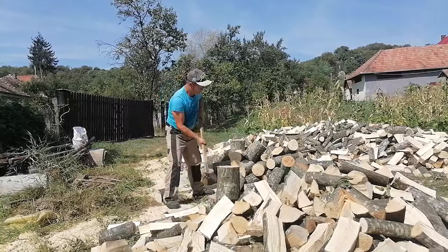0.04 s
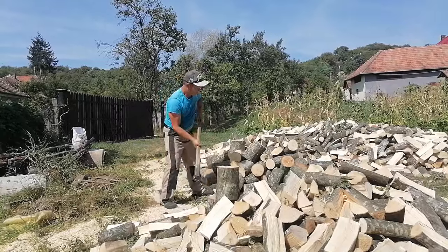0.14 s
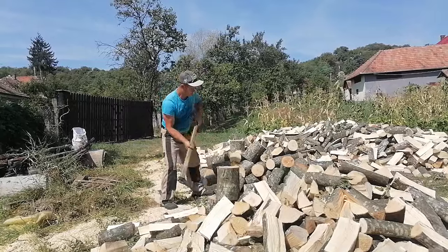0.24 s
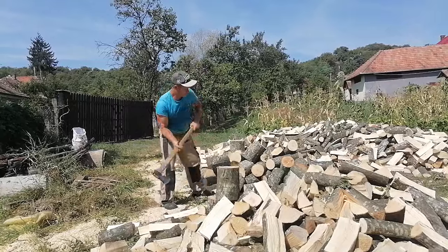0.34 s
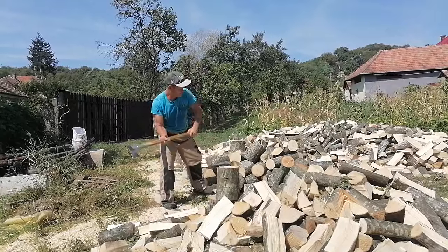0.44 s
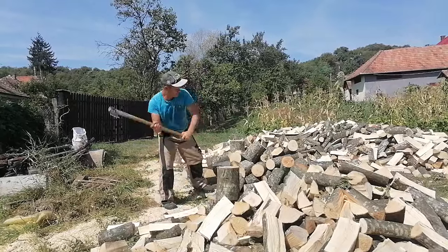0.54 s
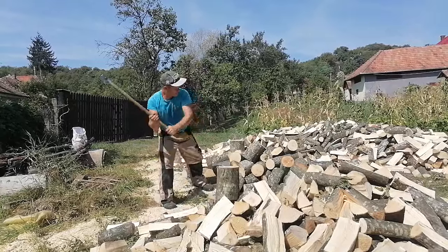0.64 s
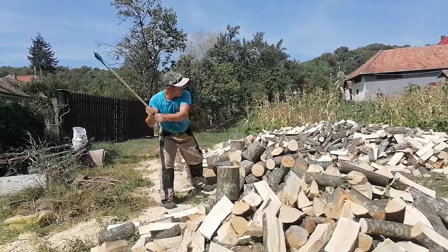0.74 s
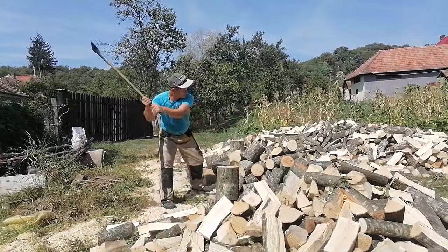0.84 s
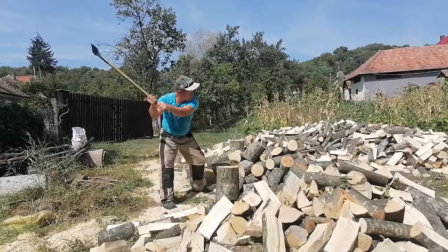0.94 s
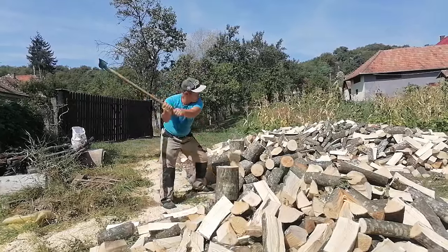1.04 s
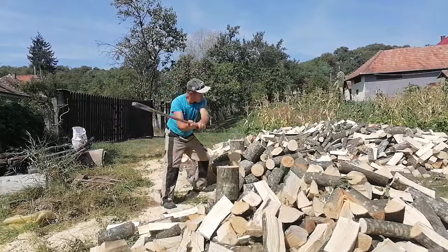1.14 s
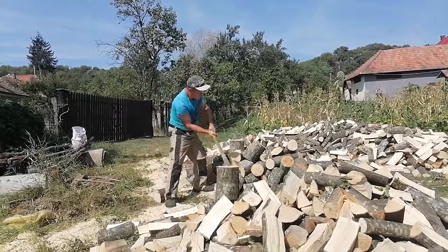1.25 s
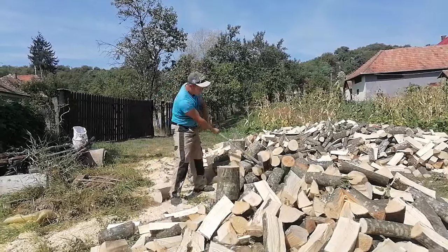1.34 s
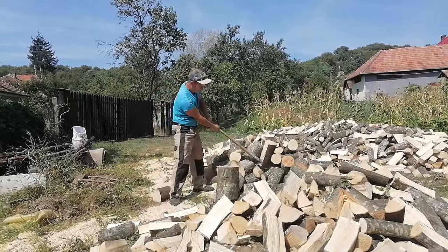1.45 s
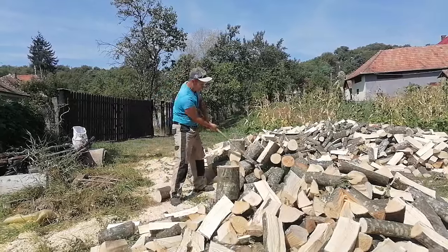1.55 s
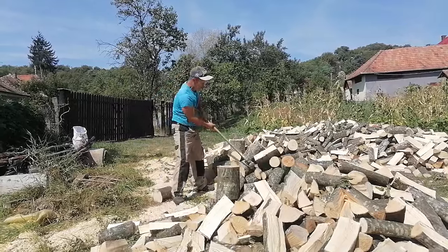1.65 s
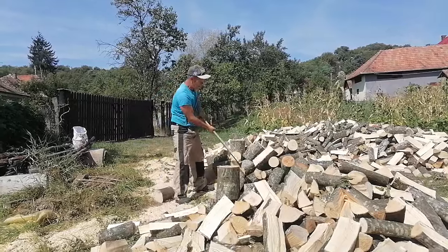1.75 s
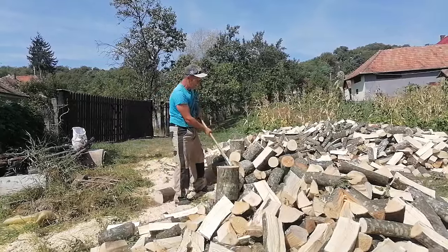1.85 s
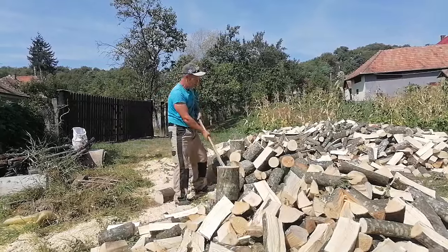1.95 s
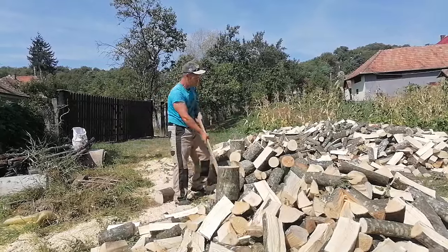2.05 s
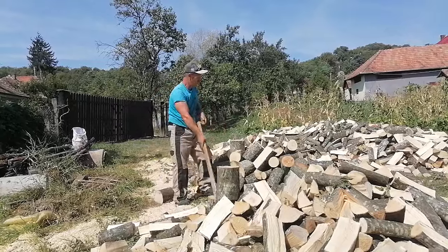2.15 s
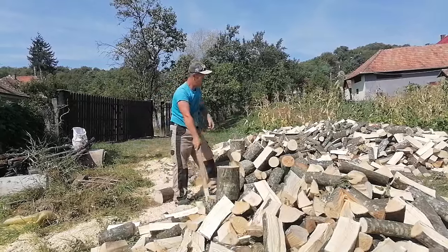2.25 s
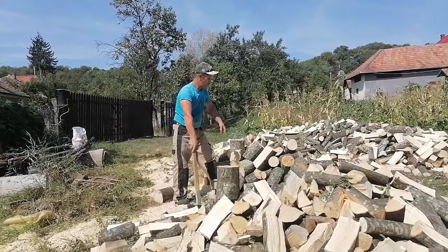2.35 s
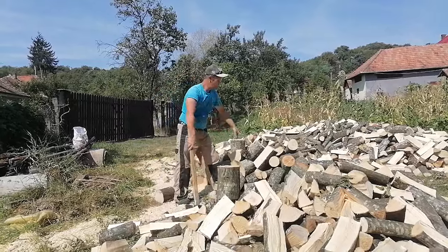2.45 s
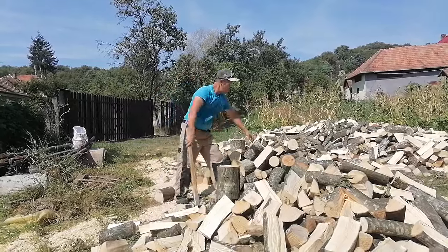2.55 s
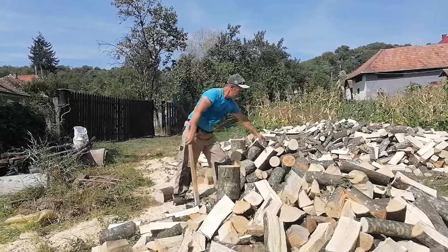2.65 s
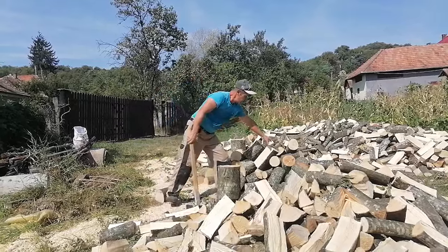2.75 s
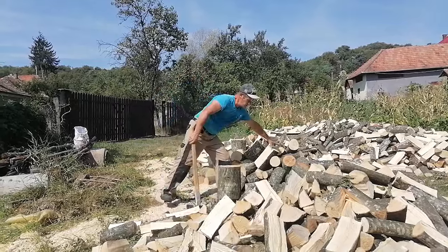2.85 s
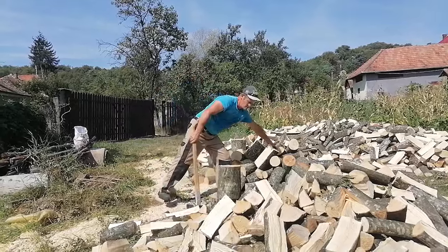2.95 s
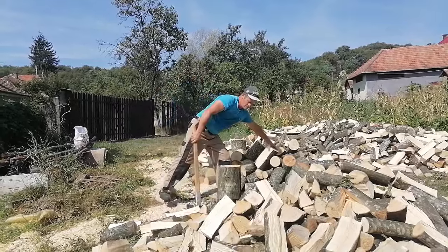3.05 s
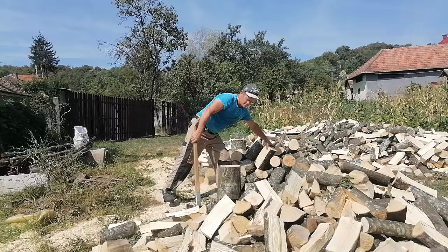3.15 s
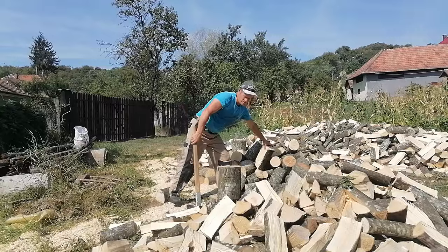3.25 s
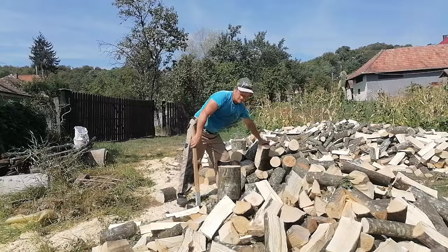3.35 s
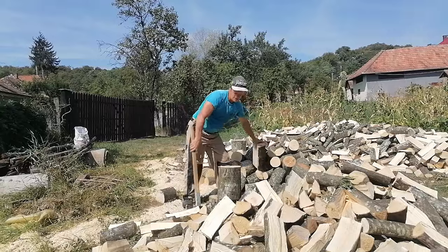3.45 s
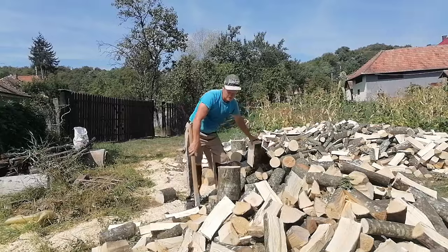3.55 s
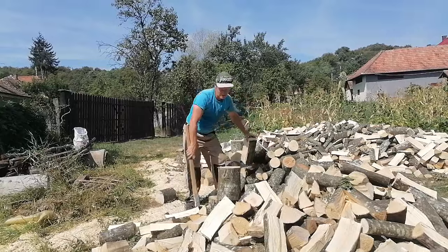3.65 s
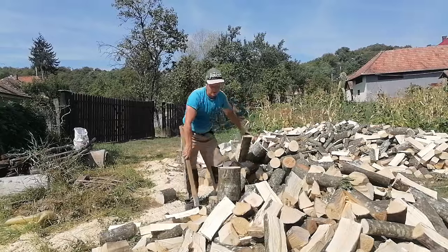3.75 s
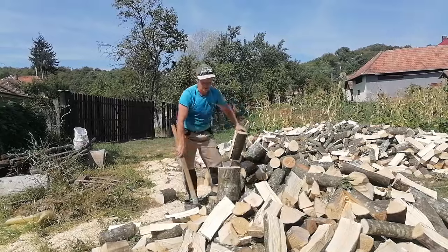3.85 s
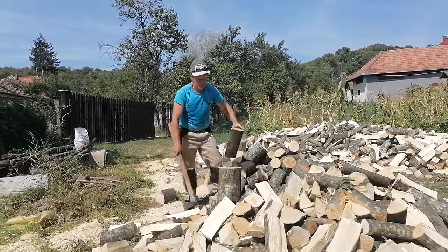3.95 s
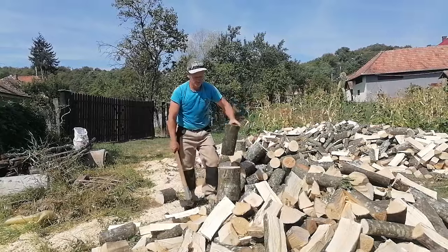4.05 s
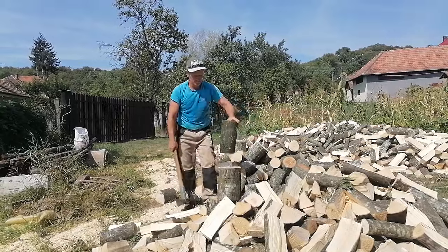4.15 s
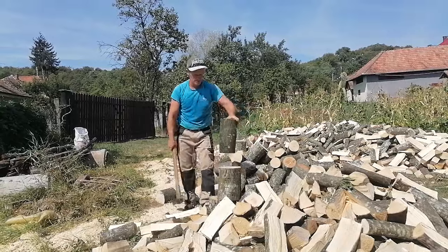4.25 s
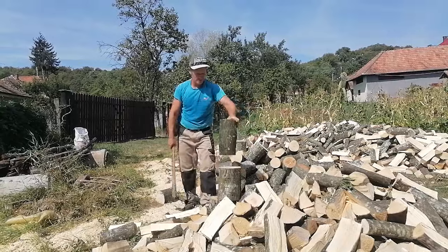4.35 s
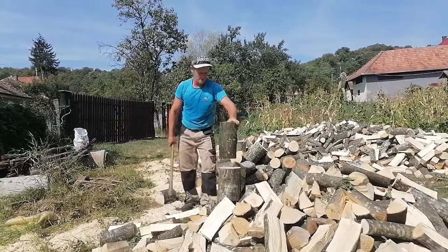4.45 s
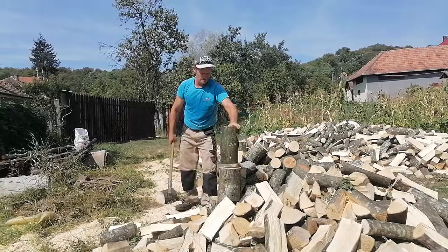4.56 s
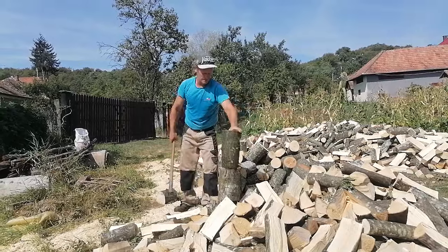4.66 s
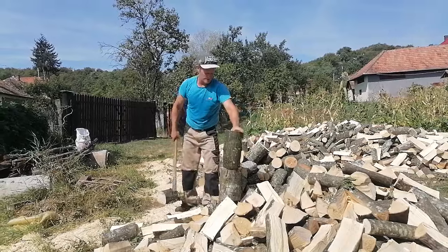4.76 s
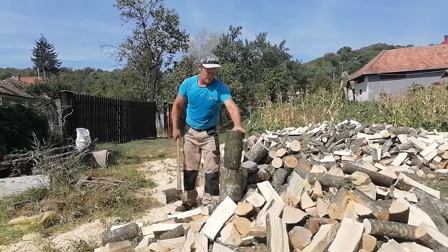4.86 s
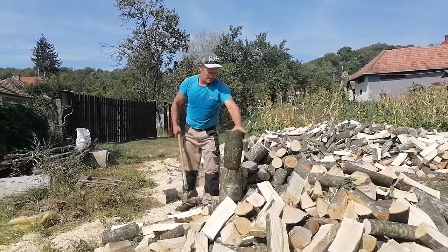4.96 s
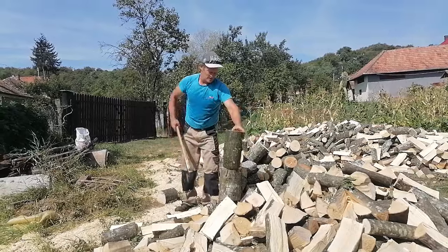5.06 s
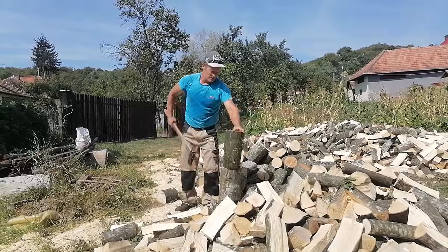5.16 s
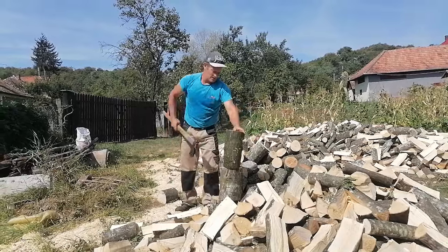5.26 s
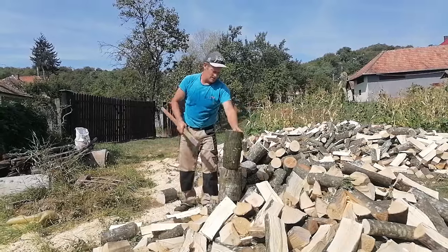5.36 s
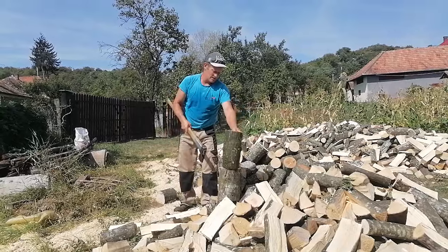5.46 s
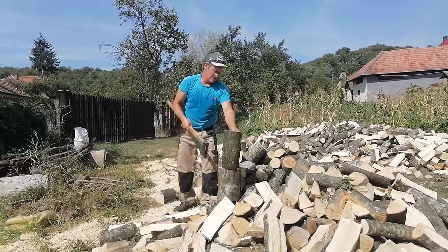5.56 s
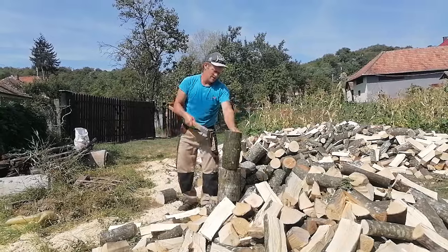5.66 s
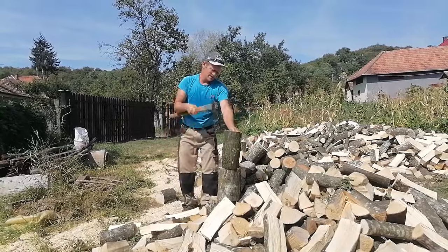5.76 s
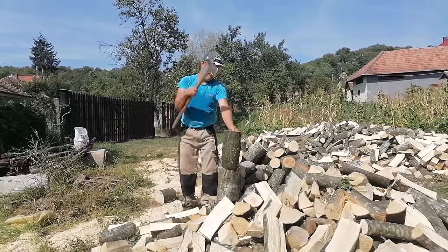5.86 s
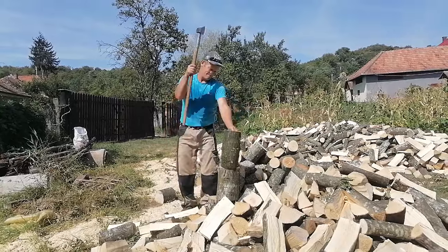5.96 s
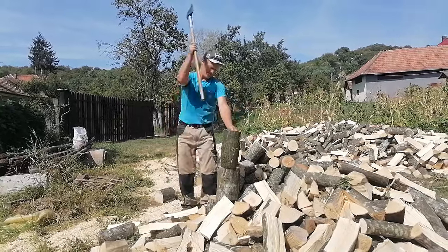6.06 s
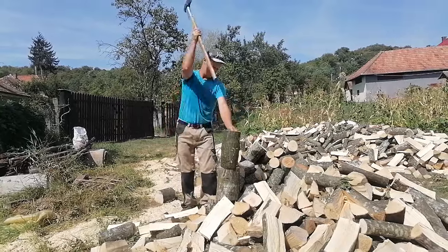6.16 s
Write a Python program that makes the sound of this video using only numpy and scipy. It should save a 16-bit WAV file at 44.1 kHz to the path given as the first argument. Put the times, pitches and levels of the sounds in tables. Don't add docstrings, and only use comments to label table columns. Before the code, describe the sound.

An axe cracks sharply into a log in a quiet country yard, split halves tumble with woody knocks, then a new log thuds onto the block.

```python
import sys
import numpy as np
from scipy import signal
from scipy.fft import rfft, irfft, next_fast_len
from scipy.io import wavfile

SR = 44100
rng = np.random.default_rng(int(sys.argv[2]) if len(sys.argv) > 2 else 0)


def ratio(d):
    e = np.asarray(d, float) / 20
    return 10 ** e


def master(y):
    cut = np.clip(np.atleast_2d(y).T, -1, 1)
    pcm = np.round(cut * 32767)
    wavfile.write(sys.argv[1], SR, pcm.astype(np.int16))


N = 274329


def clock():
    return np.arange(N) / SR


def rms_one(x):
    return x / np.sqrt(np.mean(x ** 2) + 1e-20)


def at_hz(points, hz, axis=1):
    points = np.array(points)
    return np.interp(np.log(hz + 1e-9), np.log(points[:, 0]), points[:, axis])


def colour(x, points):
    size = next_fast_len(N + 8192)
    response_db = at_hz(points, np.fft.rfftfreq(size, 1 / SR))
    cepstrum = irfft(np.log(ratio(response_db)), size)
    cepstrum[1:size // 2] *= 2
    cepstrum[size // 2 + 1:] = 0
    return irfft(rfft(x, size) * np.exp(rfft(cepstrum)), size)[..., :N]


def drift(rate_hz):
    r = np.exp(-80 * np.pi * rate_hz / SR)
    noise = rng.standard_normal(N // 40 + 2002)
    slow = rms_one(signal.lfilter([1], [1, -2 * r, r * r], noise)[2000:])
    return np.interp(np.arange(N) / 40, np.arange(len(slow)), slow)


def bump(peak_s, rise_s, fall_s):
    t = clock() - peak_s
    return np.exp(-2 * (t / np.where(t < 0, rise_s, fall_s)) ** 2)


def pair(likeness, size):
    mid, side = rfft(rng.standard_normal((2, size)))
    alike = np.clip(at_hz(likeness, np.fft.rfftfreq(size, 1 / SR), axis=-1), 0, 1)
    left_right = np.sqrt(1 + alike) * mid + np.sqrt(1 - alike) * side * [[1], [-1]]
    return irfft(left_right, size) / np.sqrt(2)


def crackle(per_s, spread_db, tone):
    size_db = spread_db * np.minimum(rng.exponential(1, (2, N)), 5)
    grains = ratio(size_db) * rng.standard_normal((2, N))
    present = rng.random((2, N)) < per_s / SR
    return rms_one(colour(grains * present, tone))


def ring(x, hz, t60_s):
    r, w = ratio(-60 / (t60_s * SR)), 2 * np.pi * hz / SR
    return signal.lfilter([0, np.sin(w)], [1, -2 * r * np.cos(w), r * r], x + 1e-18)


def contact(hardness_hz, size):
    r = np.exp(-2 * np.pi * hardness_hz / SR)
    return signal.lfilter([(1 - r) ** 2], [1, -2 * r, r * r], np.arange(size) == 0)


def snap(t60_s, size):
    return rng.standard_normal(size) * ratio(-60 * np.arange(size) / SR / t60_s)


def add(out, start_s, piece):
    at = round(start_s * SR)
    out[at:at + len(piece)] += piece[:len(out) - at]


def struck(touches, modes, snap_t60_s, bending_hz):
    force, snaps = np.zeros(N), np.zeros(N)
    for start_s, level_db, hardness_hz, snap_db in touches:
        add(force, start_s, ratio(level_db) * contact(hardness_hz, size=900))
        add(snaps, start_s, ratio(level_db + snap_db) * snap(snap_t60_s, size=1500))
    body = sum(np.sign(hz - bending_hz) * ratio(level_db) * ring(force, hz, t60_s)
               for hz, level_db, t60_s in modes)
    return snaps - body


def gain_db():
    since_s = np.maximum(clock() - 1.4697, 0)
    drop_db, fall_s, recovery_db_per_s = -5.5, 0.34, 0.25
    return drop_db * (1 - np.exp(-since_s / fall_s)) + recovery_db_per_s * since_s


# [freq_hz, density_db_per_hz]
HISS_TONE = [(300, -10.5), (3000, 4), (8000, -11), (13500, 2.5), (14800, 5), (16000, -2)]


def hiss():
    return ratio(-75.5 + gain_db()) * rms_one(colour(rng.standard_normal((2, N)), HISS_TONE))


# [time_s, level_db]
BREEZE_CURVE = [(0, -2.5), (.85, -1), (1.4, -1), (2.2, -1), (2.75, 2), (3.3, -1), (3.65, 3), (4.2, -1.5),
                (5.2, -3), (5.8, -0.5), (6.22, -1.5)]


def breeze_db():
    time_s, level_db = np.transpose(BREEZE_CURVE)
    return np.interp(clock(), time_s, level_db)


# [freq_hz, left_right_likeness (0-1)]
DIFFUSE_LIKENESS = [(60, 0.43), (270, 0.33), (740, 0.55), (1200, 0), (15000, 0.25)]


def background(level_db, tone, flicker_db, rate_hz):
    noise = rms_one(colour(pair(DIFFUSE_LIKENESS, size=N), tone))
    return ratio(level_db + flicker_db * drift(rate_hz)) * noise


# [freq_hz, density_db_per_hz]
WIND_TONE = [(20, -5), (35, -5), (60, -12), (120, -17.5), (300, -28), (1000, -60.5)]


def wind():
    port_db = np.array([[-2.], [2.]])
    level_db = -65 + 0.33 * breeze_db() + gain_db()
    return background(level_db, WIND_TONE, flicker_db=.7, rate_hz=3.73) * ratio(port_db)


# [freq_hz, density_db_per_hz]
RUMBLE_TONE = [(40, -2.5), (100, 1), (200, -0.5), (400, -4.5), (800, -7.5), (1500, -12), (3000, -21.5),
               (8000, -38.5)]


def rumble():
    level_db = -68 + .8 * breeze_db() + gain_db()
    return background(level_db, RUMBLE_TONE, flicker_db=0.51, rate_hz=7.3)


# [freq_hz, density_db_per_hz]
LEAF_TONE = [(400, -22), (1000, -8), (1600, 0.5), (2200, 3.5), (3000, -1.5), (5000, -5), (7000, -7),
             (10000, -16), (16000, -15)]


def leaves():
    return background(-67 + breeze_db() + gain_db(), LEAF_TONE, flicker_db=0.52, rate_hz=8.3)


def bird():
    return ratio(-73) * bump(6.002, .02, .02) * np.sin(2 * np.pi * 3980 * clock())


# [start_s, length_s, level_db]
TRILLS = [(.57, 0.61, -66.5), (2.4, .35, -69), (3.618, .55, -68.5)]


def cricket():
    t, level = clock(), 0
    rise_s, sag_db = 0.063, -2.5
    for start_s, length_s, level_db in TRILLS:
        edge_s = np.minimum(t - start_s, start_s + length_s - t)
        fade = np.clip(edge_s / rise_s, 0, 1)
        level = level + ratio(level_db + sag_db * (t - start_s) / length_s) * fade
    flutter = ratio(-10.5 + 3.1 * drift(18))
    pitch_hz = 2830 + 12.2 * drift(29)
    return level * flutter * np.sin(2 * np.pi * np.cumsum(pitch_hz) / SR)


# [freq_hz, density_db_per_hz]
CLOTH_TONE = [(500, -29.5), (2000, -13), (5000, -5.5), (10000, 3), (13000, -6), (16000, -7.5)]
# [centre_s, length_s, level_db]
BODY_MOVES = [(.15, 1, -76.5), (0.807, 0.23, -61.5), (1.102, 0.45, -72), (1.475, 0.39, -68),
              (1.798, 0.27, -65.5), (2.141, 0.34, -73), (2.766, .32, -69.5), (3.039, 0.23, -65.5),
              (3.239, 0.28, -74), (3.544, .12, -76), (4.088, 0.084, -75), (5.458, 0.19, -69)]


def rustle():
    level = ratio(-83.5)
    for centre_s, length_s, level_db in BODY_MOVES:
        level = level + ratio(level_db) * bump(centre_s, length_s / 2, length_s / 2)
    return level * ratio(-4.5 + 0.87 * drift(30)) * crackle(3500, 2.6, CLOTH_TONE)


def edge_tone(low_hz, top_hz, turn_s):
    sweep_s = .005
    speed = .5 + .5 * np.tanh((clock() - turn_s) / sweep_s / 2)
    pitch_hz = (low_hz + (top_hz - low_hz) * speed) * (1 + .022 * drift(196))
    return np.sin(2 * np.pi * np.cumsum(pitch_hz) / SR)


def swing():
    tones = edge_tone(2130, 3320, turn_s=1.329) + edge_tone(3150, 4550, turn_s=1.324)
    breath = ratio(-63.5 + 3.1 * drift(80))
    return breath * tones * bump(1.328, rise_s=.045, fall_s=.035)


# [start_s, level_db, hardness_hz, click_db]
LANDING = [
    (4.7738, -46, 1517, -15),
    (4.7756, -34, 1556, -25),
    (4.7770, -44.5, 2500, 1),
]
# [start_s, level_db]
LOG_CHATTER = [(4.7820, -45.5), (4.7892, -53), (4.7955, -47.5), (4.803, -56)]
# [start_s, level_db]
LOG_ROCKING = [(4.823, -63), (4.840, -62), (4.854, -66), (4.860, -57), (4.875, -59)]
# [freq_hz, level_db, t60_s]
BLOCK_MODES = [(111, -10.5, 0.08), (203, -0.5, 0.029), (298.4, 6, 0.019), (540, -2, 0.028),
               (714, -8, 0.013), (819, -16.5, .05), (1200, -13.5, 0.049), (1480, -8, 0.021),
               (1730, -14, .02), (3000, -9.5, 0.018)]


def set_down():
    chatter = [(start_s, level_db, 1350, -14) for start_s, level_db in LOG_CHATTER]
    rocking = [(start_s, level_db, 600, -30) for start_s, level_db in LOG_ROCKING]
    return struck(LANDING + chatter + rocking, BLOCK_MODES, snap_t60_s=.008, bending_hz=140)


# [start_s, level_db]
CHIP_TICKS = [(1.717, -64), (1.770, -65), (1.887, -59), (2.100, -66.5), (5.219, -66.5)]


def chip_ticks():
    out = np.zeros(N)
    for start_s, level_db in CHIP_TICKS:
        add(out, start_s, ratio(level_db) * snap(.012, size=900))
    return out


# [start_s, level_db, pitch_hz, hardness_hz]
WOOD_KNOCKS = [(1.510, -36, 330, 900), (1.518, -35, 200, 900), (1.535, -32, 290, 1520),
               (1.542, -29, 268, 2500), (1.553, -31.5, 192, 1800), (1.575, -35, 200, 1200),
               (1.582, -39, 287, 2000), (1.590, -33, 204, 1300), (1.608, -37.5, 130, 400),
               (1.620, -40.5, 195, 1400), (1.660, -51, 140, 500), (1.7160, -43, 214.4, 4040),
               (1.730, -49, 208, 1410), (1.792, -49, 142, 301), (1.812, -39, 224, 2200),
               (1.820, -43, 170, 500), (1.838, -49, 125, 300), (1.860, -48, 125.5, 349),
               (1.945, -53, 280, 1500), (1.949, -44.5, 125, 400), (1.962, -51, 200, 400),
               (2.174, -56, 85, 250), (3.034, -45, 210, 400), (3.043, -47, 220, 350),
               (3.187, -37.5, 190, 450), (3.225, -54, 110, 250), (3.268, -50.5, 150, 250)]
# [multiple of body pitch, level_db]
SHORT_LOG_MODES = [(.57, -5), (1, 0), (1.55, -8), (2.6, -5), (3.7, -8), (6.3, -22), (7.6, -19), (15., -17)]


def knocks():
    out, size, ring_cycles = np.zeros(N), 9000, 12.3
    for start_s, level_db, pitch_hz, hardness_hz in WOOD_KNOCKS:
        force, body = contact(hardness_hz, size), 0
        for n, (multiple, mode_db) in enumerate(SHORT_LOG_MODES):
            level_chance, pitch_chance = rng.standard_normal(2)
            mode_hz = pitch_hz * multiple * (1 + .04 * pitch_chance)
            t60_s = ring_cycles / pitch_hz / multiple ** .4
            mode = ratio(mode_db + 1.5 * level_chance) * ring(force, mode_hz, t60_s)
            body = body + (-1) ** n * mode
        click_db = -27 + 3 * np.log2(hardness_hz / 1000)
        bark = ratio(click_db) * snap(.012, size)
        add(out, start_s, ratio(level_db) * (bark + .35 * body))
    return out


# [freq_hz, density_db_per_hz]
SPLINTER_COLOUR = [(300, -19.5), (800, -7), (1500, 6), (3000, 0), (4200, -8), (6200, -13), (10000, -11.5),
                   (16000, -13)]
# [start_s, level_db, t60_s]
SPLINTER_SHOWERS = [
    (1.472, -33.5, 0.22),
    (1.54, -53.5, 0.42),
    (1.64, -64, .35),
    (1.716, -60.5, 0.11),
    (1.82, -64.5, 0.76),
    (4.778, -59.5, .1),
]


def splinters():
    level, rise_s = 0, .005
    for start_s, level_db, t60_s in SPLINTER_SHOWERS:
        t = np.maximum(clock() - start_s, 0)
        level = level + ratio(level_db - 60 * t / t60_s) * np.clip(t / rise_s, 0, 1)
    clumps = ratio(1.5 * drift(49))
    return level * clumps * crackle(5000, 2.297, SPLINTER_COLOUR)


# [start_s, level_db, hardness_hz, snap_db]
BLADE_BITE = [
    (1.4684, -30, 2500, -25),
    (1.4697, -17, 2600, -4.5),
    (1.4712, -14, 3000, -12),
]
# [start_s, level_db]
CRACK_JERKS = [(1.4742, -25.5), (1.4768, -28), (1.4807, -24.5), (1.4830, -27), (1.4856, -24), (1.4912, -29),
               (1.4950, -32)]
# [freq_hz, level_db, t60_s]
SPLIT_LOG_MODES = [(102.03, -21, .08), (195, -13, 0.053), (292, -10, 0.05), (570, -22, 0.036),
                   (728, -13, 0.028), (850, -9.5, 0.012), (1130, -7.5, 0.022), (1294, -3.5, 0.011),
                   (1450, -6.5, 0.014), (2528, -12.5, 0.0085), (3130, -7.5, 0.018), (3490, -16.5, 0.024),
                   (3860, -17.5, 0.012), (4860, -12, 0.012), (6480, -8.5, 0.011)]


def axe():
    tears = [(start_s, level_db, 3600, -16.5) for start_s, level_db in CRACK_JERKS]
    return struck(BLADE_BITE + tears, SPLIT_LOG_MODES, snap_t60_s=.011, bending_hz=150)


# [freq_hz, level_db, t60_s, left_right_likeness (0-1)]
YARD_ECHOES = [(80, -45, .5, 0.87), (200, -43.5, 0.5, .9), (500, -45, .3, .6), (1200, -44, .3, .1),
               (2500, -35, 0.5, 0.028), (5000, -34.5, 0.54, 0.), (8800, -42.5, 0.59, 0.44),
               (14630, -42, .3, 0.058)]


def scatter(x):
    t, echoes = np.arange(SR) / SR, 0
    edges_hz = 50 * 2 ** np.arange(0, 8.6, .5)
    noise = pair(YARD_ECHOES, size=SR)
    for low_hz, high_hz in zip(edges_hz, edges_hz[1:]):
        hz = np.sqrt(low_hz * high_hz)
        sos = signal.butter(2, [low_hz, high_hz], "band", fs=SR, output="sos")
        decay_db = -60 * t / at_hz(YARD_ECHOES, hz, axis=2)
        echoes = echoes + signal.sosfilt(sos, noise) * ratio(at_hz(YARD_ECHOES, hz) + decay_db)
    build = np.clip(t / 0.01537, 0, 1) ** 2
    return signal.fftconvolve(x[None], echoes * build)[:, :N]


# [freq_hz, level_db]
LEFT_FACING = [(1200, 2), (2500, 7.5), (5000, 4.5), (9000, 7), (16000, -0.5)]


def direct(near):
    lag_s = 0.000099
    late = np.interp(np.arange(N) - lag_s * SR, np.arange(N), near)
    return np.array([colour(near, LEFT_FACING), late])


# [freq_hz, level_db]
LEFT_RESPONSE = [(60, -5), (800, 1.5), (1900, -7), (3000, -5), (4000, -12), (5300, -2), (6200, -1.5),
                 (7600, -5.5), (8800, 2.5), (9900, 10.5), (10900, 4), (12000, -1), (16000, -3)]
RIGHT_RESPONSE = [(60, 0.5), (800, 3.5), (1600, 6.5), (1900, 4), (2800, 10), (3400, 8.5), (3900, 4.5),
                  (5200, 9.5), (6000, -1.5), (7500, -5.5), (10500, -7), (16000, -1.5)]


def ports(air):
    return np.array([colour(air[0], LEFT_RESPONSE), colour(air[1], RIGHT_RESPONSE)])


def scene():
    wood = axe() + knocks() + chip_ticks() + set_down()
    wood = signal.sosfilt(signal.butter(3, 80, "high", fs=SR, output="sos"), wood)
    floor = leaves() + rumble() + rustle() + cricket() + bird()
    air = direct(wood + swing()) + scatter(wood) + splinters() + floor
    return ports(air) + wind() + hiss()


def band_limit(x):
    return signal.sosfilt(signal.butter(12, 16400, fs=SR, output="sos"), x)


def record(dry):
    low_pass = signal.cheby2(10, 60, 16500, fs=SR, output="sos")
    return band_limit(signal.sosfilt(low_pass, dry))


dry = scene()
out = record(dry)
master(out)
```